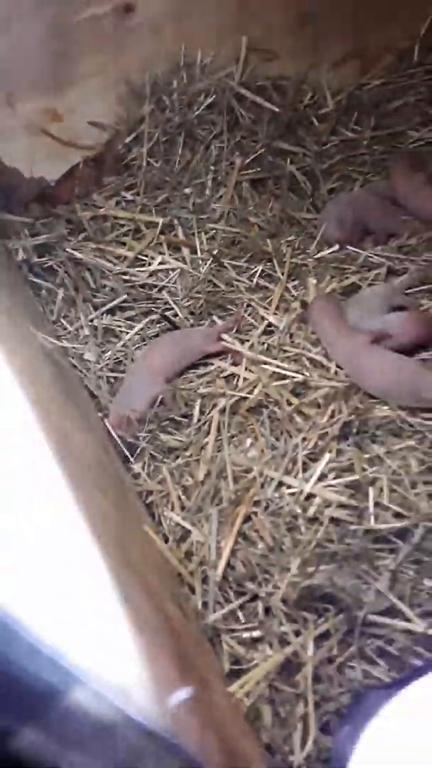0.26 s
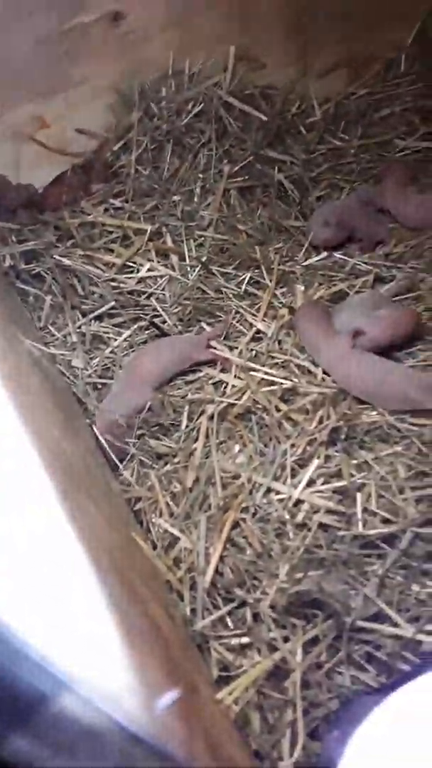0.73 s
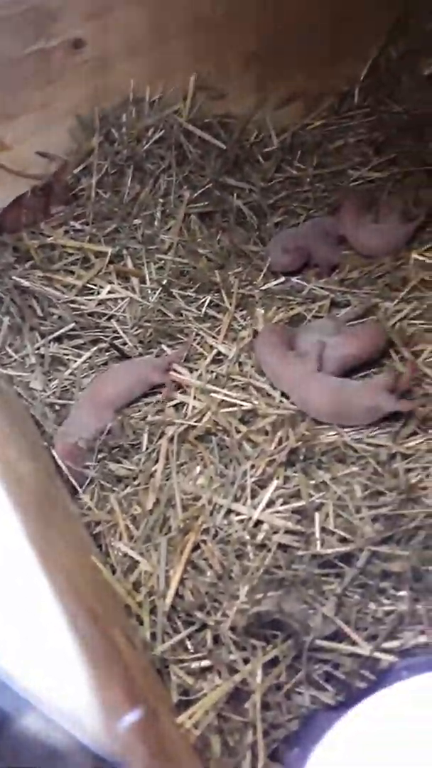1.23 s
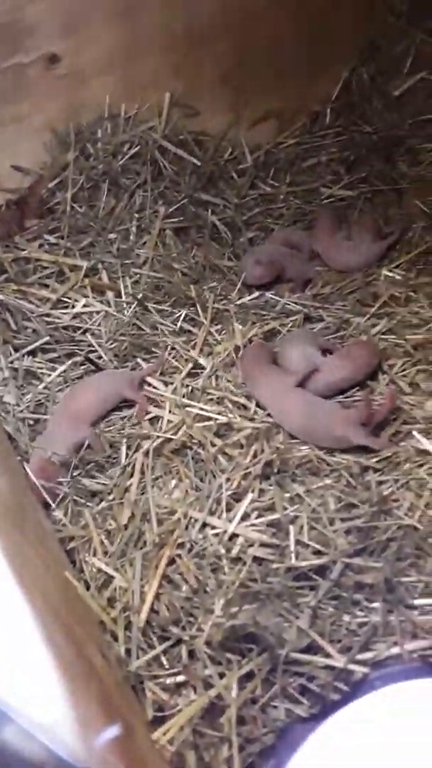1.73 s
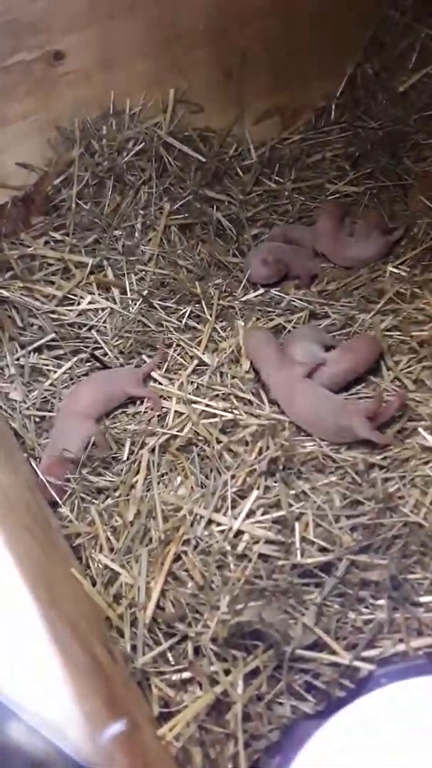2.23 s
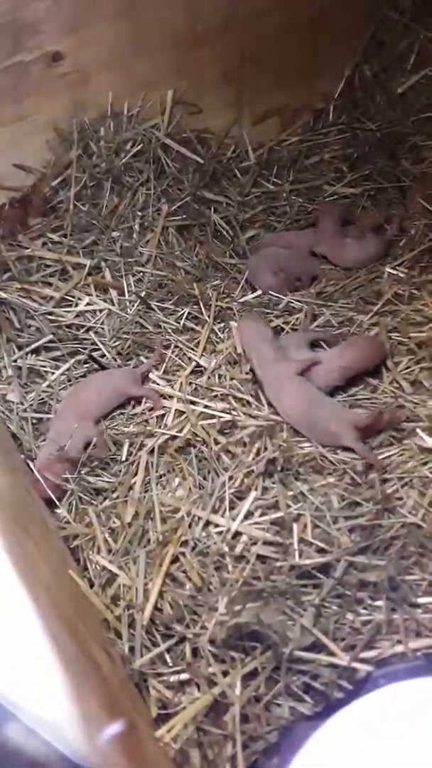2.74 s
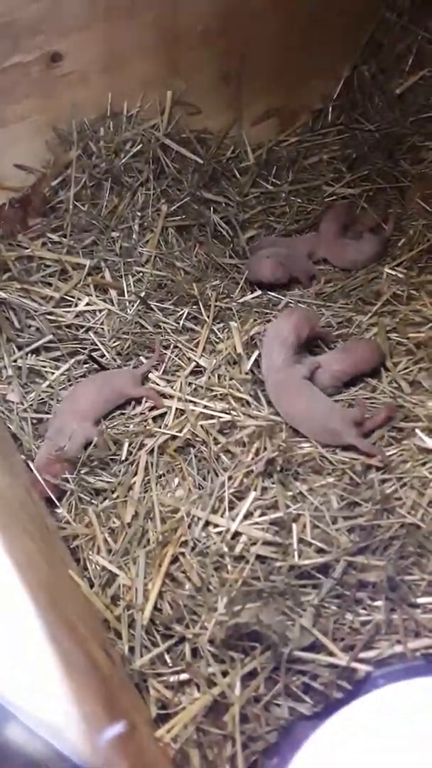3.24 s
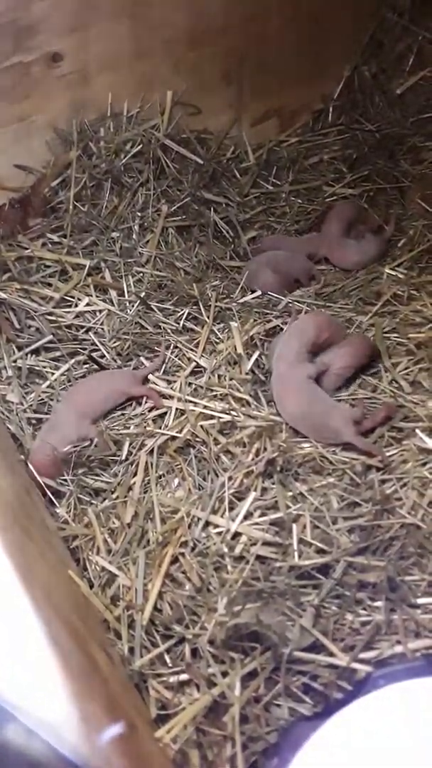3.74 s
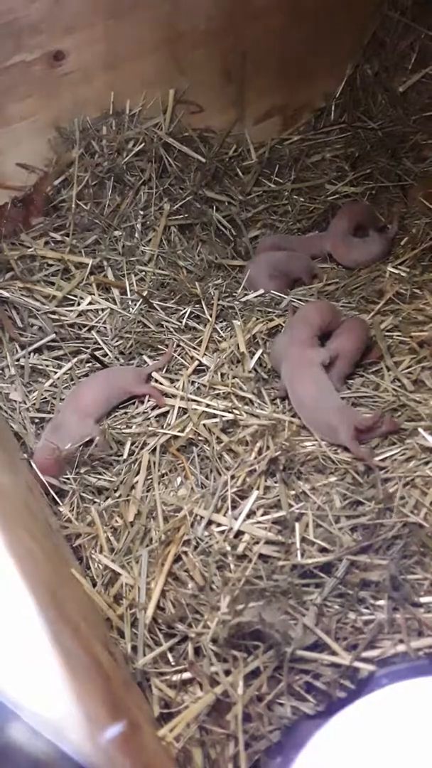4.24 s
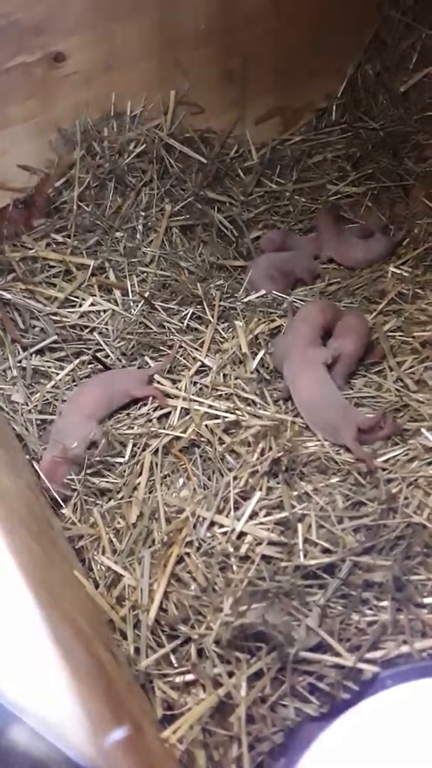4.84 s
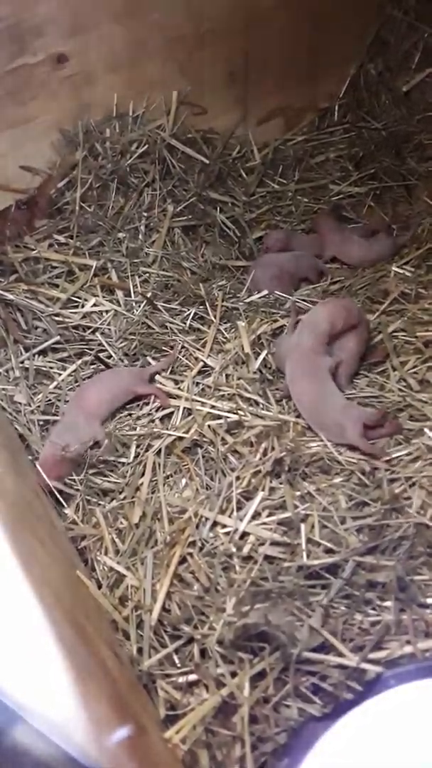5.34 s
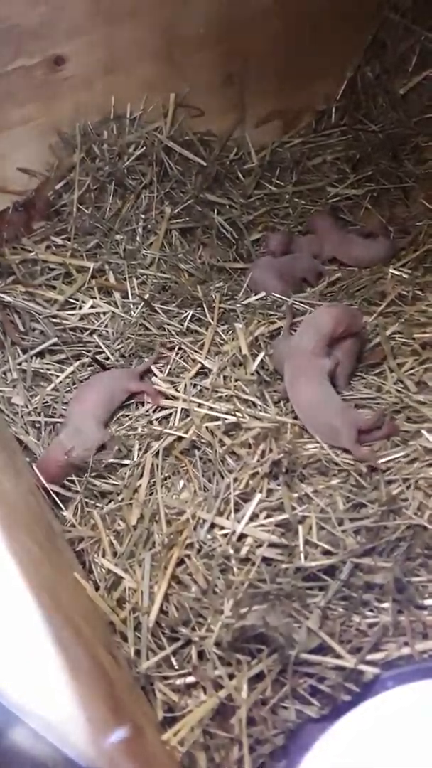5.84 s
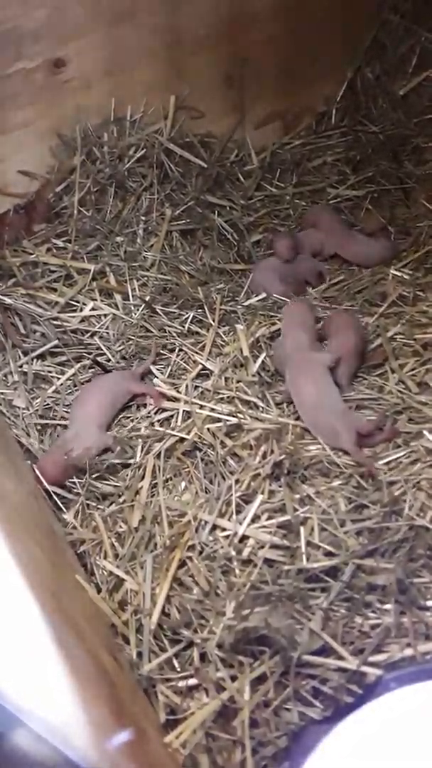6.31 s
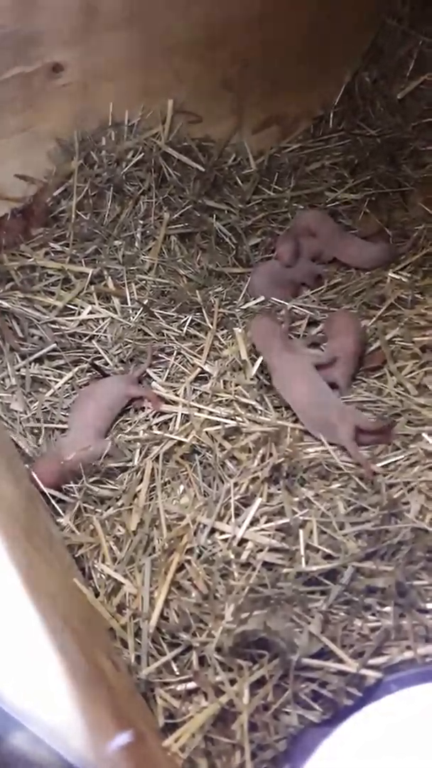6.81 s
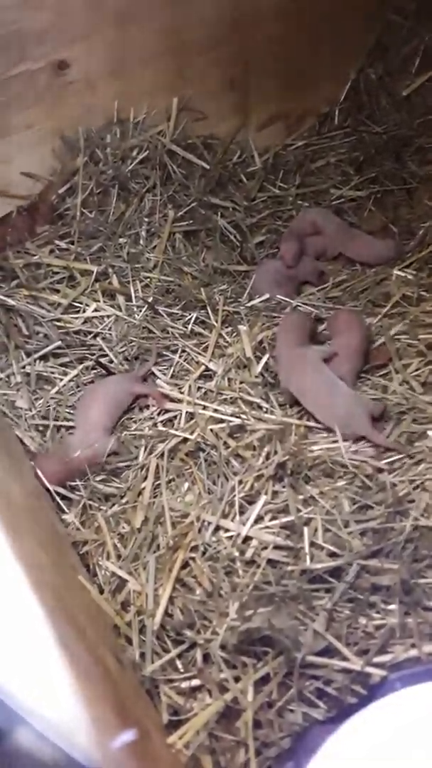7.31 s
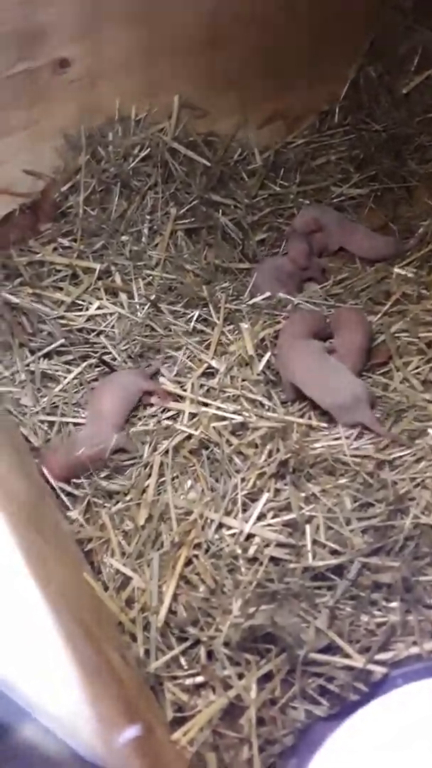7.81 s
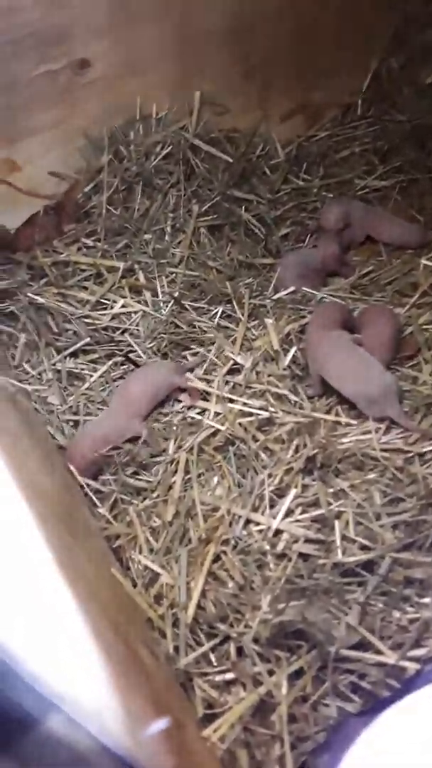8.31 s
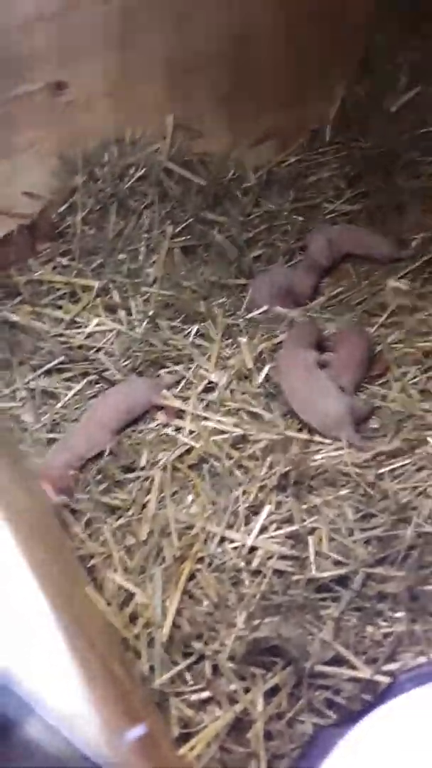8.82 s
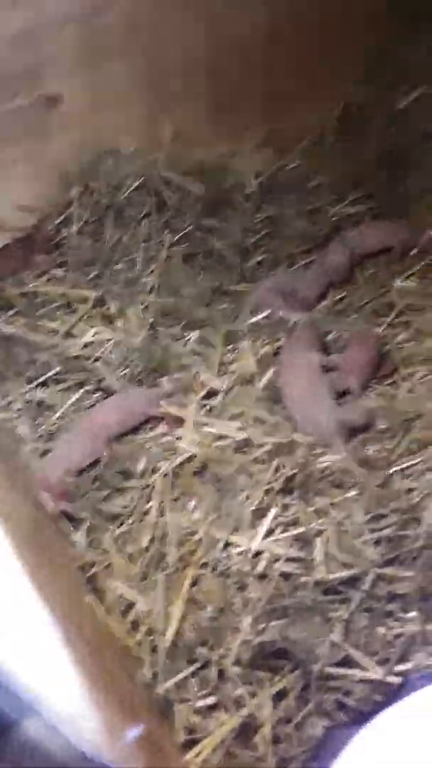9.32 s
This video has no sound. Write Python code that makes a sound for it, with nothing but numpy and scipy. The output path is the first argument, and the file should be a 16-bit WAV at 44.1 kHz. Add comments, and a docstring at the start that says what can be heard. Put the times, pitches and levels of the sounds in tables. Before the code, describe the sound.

Close, dry sound inside a small wooden nest box over a low quiet hush. Straw rustles softly, building to a burst of crisp snaps around three seconds. Tiny newborn ferret kits give faint, brief squeaks and breathy puffs. Sharp knocks and bright clicks jump out past four seconds with a scraping slide, then a faint creaky cry, another double knock at six, and light rustling to the end.

```python
"""Ferret kits in a straw nest

Newborn kits squeak faintly in a wooden nest box, close to a hand-held camera's microphone.
Squeaks are harmonic stacks and one creak is pulsed; breathy puffs are noise in two bands. Straw is gritty
noise, ticks and snaps; dry slides are dense fine grains. Knocks and clicks are falling tones that reach the
microphone through the box and the camera body. Soft bumps are resonant noise over the room's low hush."""
import sys
import numpy as np
from scipy import signal
from scipy.fft import rfft, irfft, next_fast_len
from scipy.io import wavfile
from scipy.ndimage import uniform_filter1d, map_coordinates

SR = 44100
rng = np.random.default_rng(int(sys.argv[2]) if len(sys.argv) > 2 else 0)


def unload_wav(signal):
    """Save mono or channel-first audio to the path in sys.argv[1] as 16-bit WAV at rate SR, clipped to [-1, 1]."""
    wavfile.write(
        sys.argv[1],
        SR,
        np.round(np.clip(np.atleast_2d(signal).T, -1, 1) * 32767).astype(np.int16),
    )


N = 421596  # length in samples

# knocks on a thin panel: [t/s, level/dB, pitch drop f/Hz]
PANEL_KNOCKS = [(0.38, -31.5, 617), (4.3817, -9.5, 1460), (4.3884, -14.5, 1086), (4.441, -12.5, 1960),
                (4.694, -24.5, 830), (5.144, -22.5, 934), (6.2319, -8, 1936), (6.242, -8.5, 1300),
                (6.64, -29, 883), (7.226, -21, 454), (7.341, -29.5, 497), (7.493, -27, 540),
                (7.603, -31, 298), (7.789, -20.5, 650)]

TOP_HZ = 15900  # the microphone's band limit
BOUT_ATTACK_S = 0.016  # a bout of wriggling and the creaky cry both start briskly
STROKE_RELEASE_S = 0.01  # sliding strokes and the creaky cry both stop short


def kits():
    """The nearest kits squeak; the longer a cry, the more its pitch arches."""
    # single squeaks: [t/s, length/s, middle f/Hz, rise from start to end f/Hz, level/dB, overtone level/dB]
    cries = [(2.516, 0.036, 2500, -150, -48, -14), (2.569, 0.068, 2600, -130, -44.5, -11),
             (3.67, 0.029, 2560, -300, -50, -15), (3.994, 0.081, 1690, 5, -49.5, 4),
             (4.06, 0.052, 2595, -170, -47, -10), (4.229, 0.031, 2180, 0, -52, -22),
             (4.281, 0.033, 1030, -120, -51, 7), (4.312, 0.038, 2160, -50, -50, -20),
             (5.717, 0.031, 1883, 698, -48, -2), (6.253, 0.04, 2500, -310, -51, -10),
             (7.267, 0.027, 2110, 200, -50.5, -17), (7.41, 0.18, 837, 470, -50, 9),
             (7.436, 0.044, 2170, 1502, -55, -16), (8.043, 0.037, 2560, -36, -53, -20),
             (8.305, 0.012, 2640, 0, -49, -20), (8.4, 0.023, 2450, -260, -45.5, -6),
             (8.591, 0.125, 1257, 30, -53, -6), (8.706, 0.108, 1215, -40, -52.5, -4.5)]
    arch_share, full_arch_s = 0.064, 0.085  # drop of the ends below the middle, reached at this length
    out = np.zeros(N)
    for s, length, pitch_hz, rise_hz, db, overtones_db in cries:
        ends_hz = pitch_hz * (1 - arch_share * min(length / full_arch_s, 1) ** 2)
        start_hz, end_hz = ends_hz - rise_hz / 2, ends_hz + rise_hz / 2
        cry = squeak(length, start_hz, pitch_hz, end_hz, .018, overtones_db)
        add(out, s, amp(db) * cry)
    return out


def squeak(length, start_hz, middle_hz, end_hz, jitter, overtones_db=0, count=12):
    """One arched tone: a trembling harmonic stack through a tiny throat, each partial veiled in air."""
    # air that veils a squeak, most in low pressed cries: [pitch f/Hz, level/dB]
    hoarseness = [(800, -8), (1200, -14), (2600, -13)]
    # colour of the tiny throat: [f/Hz, level/dB]
    throat = [(600, -34), (1200, -2.5), (2500, -1.5), (3600, -5), (5100, -1.5), (8200, -3), (14000, -31)]
    u = np.linspace(0, 1, max(int(length * SR), 200))

    def flutter():
        """Slow random tremble at rms 1."""
        return coloured(rng.standard_normal(len(u)), [(150, 0), (600, -40)])

    hoarse = amp(along(hoarseness, middle_hz))
    arch = np.polyval(np.polyfit([0, .5, 1], [start_hz, middle_hz, end_hz], 2), u)
    pitch = arch * (1 + jitter * hoarse * flutter())
    k = np.arange(1, count + 1)[:, None]
    air = hoarse * np.array([flutter() + 1j * flutter() for _ in k])
    voice = np.imag((1 + air) * np.exp(2j * np.pi * k * np.cumsum(pitch) / SR))
    partials = amp(along(throat, k * pitch)) * (k * pitch < TOP_HZ) * voice
    stack = (partials * amp(overtones_db * (k > 1))).sum(0)
    return unit(stack * np.abs(np.sin(np.pi * u)) ** .5)


def rasp():
    """A kit creaks: uneven pulses in breath noise, slowing from a buzz to a rattle, ring its throat."""
    # colour of the creak, strongest at the top of the throat: [f/Hz, level/dB]
    creak_colour = [(700, -14), (2500, -5.5), (5800, -9), (7500, 1), (9000, -10.5), (14000, -29)]
    start_s, length_s, level_db = 5.35, 0.35, -43
    start_hz, end_hz = 599, 100.7  # the pulses slow down as the air runs out
    out = np.zeros(N)
    strength = effort(length_s, BOUT_ATTACK_S, STROKE_RELEASE_S, sag_db_per_s=21.5)
    u = np.minimum(np.arange(len(strength)) / SR / length_s, 1)
    rate = start_hz * (end_hz / start_hz) ** u * (1 + .5 * rng.standard_normal(len(u)))
    pulses = np.diff(np.floor(np.cumsum(rate) / SR), prepend=0)
    breath = 2.0 * rng.standard_normal(len(u))
    add(out, start_s, amp(level_db) * strength * coloured(unit(pulses) + breath, creak_colour))
    return out


def breathy_puffs():
    """Breathy puffs of noise in two bands, the lower one around a faint wavering tone."""
    # breathy puffs: [t/s, length/s, level/dB, upper band level/dB, pitch f/Hz]
    puffs = [(0.119, 0.17, -44, -2, 2290), (0.291, 0.52, -50.5, -11, 2695), (0.847, 0.22, -41.5, 1, 2505),
             (1.504, 0.43, -45, -1, 2570), (5.775, 0.14, -45, 0.5, 2650), (5.971, 0.74, -51, -14, 2584),
             (7.069, 0.35, -51.5, -7, 2630), (7.718, 0.67, -50.5, -31, 2545), (8.474, 0.03, -47, -19, 3350),
             (8.891, 0.18, -46, -1, 2540), (9.377, 0.076, -48, 7, 2530)]
    out = np.zeros(N)
    for s, length, db, upper_db, pitch_hz in puffs:
        def bands(hz):
            """The band at the puff's pitch and the upper one."""
            lower = resonance(hz, pitch_hz, width_hz=1250) ** 2
            return lower + amp(upper_db) * resonance(hz, 7560, width_hz=1900) ** 2

        tone = squeak(length, pitch_hz, pitch_hz, pitch_hz, jitter=0.1356, count=1)
        add(out, s, amp(db - 4.0) * (swell(length, bands) + amp(-7.5) * tone))
    return out


def straw(crisp, dull):
    """Crawling bodies bend stalks (crisp ticks) and scuff the packed bedding (dull grains)."""
    # pushes into the bedding: [t/s, length/s, crisp level/dB, dull level/dB, clump f/Hz]
    pushes = [(0.793, 0.055, -66, -38.5, 480), (0.851, 0.047, -61, -35.5, 674),
              (1.464, 0.04, -55, -39, 750), (1.59, 0.091, -43, -35.5, 640), (2.227, 0.021, -41.5, -33, 446),
              (2.28, 0.075, -38, -33, 600), (2.463, 0.085, -38, -35, 780), (2.569, 0.069, -41.5, -35, 650),
              (2.709, 0.043, -44, -33.5, 580), (2.799, 0.046, -48, -35.5, 530),
              (3.176, 0.064, -37, -27, 1130), (3.591, 0.1, -56, -42, 930), (3.783, 0.025, -45, -30.5, 1760),
              (4.315, 0.028, -51, -41, 930), (6.099, 0.017, -47, -49, 600), (6.324, 0.028, -41, -51, 500),
              (6.995, .03, -53, -42, 2430), (9.221, 0.036, -40.5, -39, 870)]
    # colour of the loose stalks: [f/Hz, level/dB]
    stalk_colour = [(710, -11), (1200, -5.5), (1910, -8), (2600, -4.5), (4650, -5), (8170, -1),
                    (10400, -10.5), (11800, -37.5), (16000, -55)]
    # colour of the packed bedding: [f/Hz, level/dB]
    bedding_colour = [(350, -9.5), (430, 8), (520, -3.5), (650, 1), (900, -2), (1600, -11.5), (2500, -4.5),
                      (4000, -39)]
    # the stalks stir fairly evenly; the bedding gives way in jerks
    crisp = crisp * amp(-1.5 + 2.3 * wobble(70))
    dull = dull * amp(-1.0 + 4.2 * wobble(40))
    clumps = np.zeros(N)
    # each push of a leg gives way quickly, settles slowly and shakes a clump with its own pitch
    for s, length, crisp_db, dull_db, clump_hz in pushes:
        u = np.arange(SR // 4) / SR / max(length, .01)
        push = (1 - np.exp(-u / 0.019)) * np.exp(-u ** 2)
        clump = filtered(rng.standard_normal(len(u)), lambda hz: resonance(hz, clump_hz, clump_hz * 0.28))
        add(crisp, s, amp(crisp_db) * push)
        add(clumps, s, amp(dull_db - 5.0) * push * unit(clump))
    stalks = coloured(patchy(grit(N, rate=1200, spread_db=6.0, share=0.39), depth_db=2.5), stalk_colour)
    bedding = coloured(patchy(grit(N, rate=200, spread_db=3.0, share=0.22), depth_db=3.5), bedding_colour)
    return crisp * stalks + dull * bedding + clumps


def wriggling():
    """Strength of the crisp rustle and of the dull scuffing; overlapping bouts add in power."""
    # bouts of wriggling in the straw: [t/s, length/s, crisp rustle level/dB, dull scuffing level/dB]
    bouts = [(0.339, 0.85, -52, -57), (0.831, 0.27, -43.5, -49.5), (1.345, 0.18, -48.5, -55.5),
             (1.587, 0.29, -42.5, -53.5), (1.976, 0.79, -47, -55.5), (2.873, 0.27, -41, -45.5),
             (3.145, 0.38, -37.5, -45.5), (3.565, 0.22, -44, -45.5), (3.89, 0.29, -47.5, -51.5),
             (4.296, 0.07, -44.5, -43), (5.13, 0.81, -56, -62), (6.08, 0.22, -49.5, -69),
             (6.937, 0.52, -50.5, -64.5), (7.384, 0.62, -48.5, -53), (8.108, 0.94, -51, -60.5),
             (9.131, 0.15, -48.5, -54.5), (9.352, 0.27, -46.5, -54)]
    # the straw between bouts
    crisp, dull = np.full(N, amp(-59) ** 2), np.full(N, amp(-66.5) ** 2)
    for s, length, crisp_db, dull_db in bouts:
        # the negative sag lets a bout grow slightly until it settles
        bout = effort(length, BOUT_ATTACK_S, release_s=0.072, sag_db_per_s=-1.5)
        add(crisp, s, (amp(crisp_db) * bout) ** 2)
        add(dull, s, (amp(dull_db) * bout) ** 2)
    return np.sqrt(crisp), np.sqrt(dull)


def ticks(crisp, dull):
    """Single stalks flick free and ring briefly, low ones with the scuffing, high ones with the rustle."""
    ticks_per_s, tick_db, spread_db = 42, 12.5, 14
    decay_cycles = 23  # cycles in which a tick falls 60 dB
    low_hz, high_hz = 431, 9070  # thick packed stalks to thin loose ones
    out, t = np.zeros(N), np.arange(SR // 16) / SR
    for when, thinness, chance in rng.random((int(ticks_per_s * N / SR), 3)):
        i = int(when * N)
        hz = low_hz * (high_hz / low_hz) ** thinness
        movement = dull[i] ** (1 - thinness) * crisp[i] ** thinness
        strength = movement * amp(tick_db + spread_db * (2 * chance - 1.5))
        ring = (1 - np.exp(-hz * t)) * amp(-60 * hz * t / decay_cycles)
        add(out, i / SR, strength * ring * np.sin(2 * np.pi * hz * t))
    return out


def snaps(crack_t60=0.031, shiver_t60=0.077):
    """A stalk gives way fibre by fibre and rings at its own pitches; its neighbours shiver to rest."""
    # snapping straws: [t/s, level/dB, body level against the crack/dB]
    breaks = [(3.052, -19.5, -38), (3.082, -20, -32), (3.1062, -22, -31), (3.183, -12, -23),
              (3.2226, -16.5, -21), (3.2611, -8, -15), (3.342, -14.5, -2), (3.4243, -18, -8),
              (3.481, -19, -32), (3.5067, -11, -44), (7.0746, -29.5, -32), (7.589, -25.5, -5),
              (8.984, -20, -8), (9.0215, -29, -7)]
    # colour of the crack: [f/Hz, level/dB]
    crack_colour = [(900, -49), (1800, -11), (3000, -26), (4000, 2.5), (4800, -9.5), (6200, 1), (9200, 6),
                    (10400, 0), (11500, -11), (16000, -25)]
    out, t = np.zeros(N), np.arange(SR // 4) / SR
    decay = amp(-60 * t / crack_t60) + amp(-3.5) * amp(-60 * t / shiver_t60)
    shape = decay * (1 - np.exp(-t / 0.00073))
    for s, db, body_db in breaks:
        stalk_hz = 3500 + 5000 * rng.random(size=3)
        fibres = grit(len(t), rate=1800, spread_db=6, share=0.53)
        crack = filtered(fibres, lambda hz: 1 + sum(resonance(hz, c, width_hz=800) for c in stalk_hz))
        thud = unit(filtered(fibres, lambda hz: resonance(hz, 1850, width_hz=5400) ** 2))
        add(out, s, amp(db - 7.5) * shape * (coloured(crack, crack_colour) + amp(body_db) * thud))
    return out


def slides():
    """Smooth dry friction: dense fine grains that wake a few broad resonances."""
    # colour of the grains: [f/Hz, level/dB]
    hiss_colour = [(180, -15), (300, -8.5), (380, -11.5), (856, -9.5), (1360, -15.5), (2100, -8.5),
                   (4230, -7.5), (8220, 0.5), (10000, -2.5), (11300, -18), (16000, -31)]
    # resonances woken by the friction: [f/Hz, width/Hz, level/dB]
    peaks = [(878, 100, -13.5), (2116, 520, -9), (6200, 860, -7.5)]
    grains = grit(N, rate=4200, spread_db=-4, share=0.59)
    body = filtered(rng.standard_normal(N),
                    lambda hz: sum(amp(db) * resonance(hz, c, w) ** 2 for c, w, db in peaks))
    friction = coloured(grains, hiss_colour) + amp(-7.5) * unit(body)
    return pressure() * amp(0.97 * wobble(53)) * friction


def pressure():
    """Strength of the sliding strokes, each losing pressure as it goes."""
    # dry sliding strokes: [t/s, length/s, level/dB]
    strokes = [(0, 0.11, -32.5), (0.13, 0.094, -41.5), (0.235, 0.14, -37), (0.28, 0.071, -32),
               (4.472, 0.13, -31), (4.549, 0.5, -26.5), (5.07, 0.061, -31), (6.357, 0.23, -30.5),
               (6.576, 0.051, -24.5)]
    power = np.zeros(N)
    for s, length, db in strokes:
        stroke = effort(length, attack_s=0.022, release_s=STROKE_RELEASE_S, sag_db_per_s=19)
        add(power, s, (amp(db) * stroke) ** 2)
    return np.sqrt(power)


def knocks(last_hz=185, push_hz=85):
    """Bending waves spread as they travel: the highs arrive first and the pitch drops into a thud."""
    # modes of the knocked panel: [f/Hz, width/Hz, level/dB]
    modes = [(261, 88, 1), (612, 66, -7.5), (870, 270, -4)]
    out, t = np.zeros(N), np.arange(SR // 8) / SR
    ring = (1 - np.exp(-t / .0008)) * np.exp(-(t / .0095) ** 2)
    for s, db, drop_hz in PANEL_KNOCKS:
        # softer knocks drop in pitch more slowly: the time doubles for every 16 dB
        glide_s = 0.002065 * 2 ** ((-10 - db) / 16)
        pitch = last_hz + drop_hz * np.exp(-t / glide_s)
        # reflections from the panel's edges roughen the glide
        scatter = unit(filtered(rng.standard_normal(len(t)), lambda hz: resonance(hz, 95, width_hz=1030) ** 2))
        wave = np.sin(2 * np.pi * np.cumsum(pitch) / SR + .5 * scatter)
        # hard knocks also shove the whole panel
        shove = amp(db + 6) * np.sin(2 * np.pi * push_hz * t)
        add(out, s, amp(db - 9.0) * (wave + shove) * ring)
    return filtered(out, lambda hz: 1 + 2 * sum(amp(db) * resonance(hz, c, w) for c, w, db in modes))


def clicks():
    """Lone clicks, and the contact that starts each knock, softened at the very top."""
    # lone sharp clicks: [t/s, level/dB, centre f/Hz]
    lone = [(4.3913, -14, 6060), (4.6753, -4.5, 8240), (4.689, -4.5, 7220), (4.693, -12.5, 3330),
            (5.1506, -23, 6700), (7.4915, -26.5, 3480), (7.7745, -24, 3260), (8.2442, -27.5, 7380),
            (8.985, -23.5, 4450)]
    # the contact loses 1.7 dB for each dB of a softer knock
    contacts = [(s, -15 + 1.7 * (db + 10), 6870) for s, db, _ in PANEL_KNOCKS]
    out = np.zeros(N)
    for s, db, hz in list(lone) + contacts:
        add(out, s, amp(db) * click(hz))
    return filtered(out, lambda hz: 1 / (1 + (hz / 10700) ** 12))


def click(hz, rattle=0.3, rattle_s=0.0015):
    """A hard contact of peak about 1: a chirp falling through hz, then a short toneless rattle."""
    peak_s, octave_s = 0.000488, 0.000452  # rise time; time in which the pitch falls an octave
    t = np.arange(SR // 100) / SR
    pitch = hz * 2 ** ((peak_s - t) / octave_s)
    u = t / peak_s
    chirp = (u * np.exp(1 - u)) ** 2 * np.sin(2 * np.pi * (np.cumsum(pitch) / SR + rng.random()))
    tail = unit(filtered(rng.standard_normal(len(t)), lambda f: resonance(f, hz, hz / 2)))
    return chirp + rattle * np.minimum(u, 2) * np.exp(-t / rattle_s) * tail


def box(x):
    """The short answer of the wooden walls: decaying noise, 4 ms late."""
    # decay of the box: [f/Hz, t60/s]
    decay = [(200, 0.049), (2000, 0.09), (8000, 0.22), (15000, 0.05)]
    hz, t, z = signal.stft(rng.standard_normal(SR // 3), SR, nperseg=256)
    tail = signal.istft(z * amp(-60 * t / along(decay, hz)[:, None]), SR, nperseg=256)[1]
    answer = np.pad(tail / np.linalg.norm(tail), (int(0.004 * SR), 0))
    return signal.fftconvolve(x, answer)[:N]


def background(dull):
    """Muffled bumps, resonant swells of noise, over the low hush of the room."""
    # soft bumps of bodies and hands: [t/s, length/s, level/dB, pitch f/Hz]
    bumps = [(0.839, 0.098, -43.5, 186), (1.844, 0.066, -46.5, 168), (2.223, 0.1, -45.5, 203),
             (2.863, 0.097, -41, 132), (3.344, 0.067, -32.5, 145), (3.617, 0.25, -39, 165),
             (4.061, 0.07, -39.5, 166), (4.38, 0.12, -42, 89), (4.519, 0.12, -42.5, 160),
             (4.962, 0.05, -42.5, 159), (7.95, 0.22, -46, 163), (8.102, 0.07, -43, 88.5),
             (8.596, 0.25, -44.5, 78), (9.142, 0.065, -41, 130)]
    # colour of the room's hush: [f/Hz, level/dB]
    hush_colour = [(25, -26), (70, 0.5), (190, -3), (350, -16), (1500, -25), (12500, -30.5), (16000, -40)]
    out = amp(-54.0) * coloured(rng.standard_normal(N), hush_colour)
    for s, length, db, pitch_hz in bumps:
        add(out, s, amp(db) * swell(length, lambda hz: resonance(hz, pitch_hz, pitch_hz * .6) ** 2))
    # scuffing in the bedding also shakes the floor of the box
    floor = unit(filtered(rng.standard_normal(N), lambda hz: resonance(hz, 125, width_hz=253) ** 3))
    return out + amp(-2.0) * dull * floor


def effort(length, attack_s, release_s, sag_db_per_s):
    """Gain over one movement: it rises, sags (or grows, if negative) and dies away after its length."""
    t = np.arange(int(length * SR) + SR // 2) / SR
    rise = 1 - np.exp(-(t / attack_s) ** 2)
    return rise * amp(-sag_db_per_s * t) * np.exp(-np.maximum(t - length, 0) / release_s)


def grit(size, rate, spread_db, share):
    """White friction noise in which a share of the power comes as tiny ticks of uneven size."""
    sizes = amp(spread_db * (2 * rng.random(size) - 1))
    specks = (rng.random(size) < rate / SR) * rng.choice([-1, 1], size) * sizes
    share = np.clip(share, 0, 1)
    return np.sqrt(share) * unit(specks) + np.sqrt(1 - share) * rng.standard_normal(size)


def patchy(x, depth_db):
    """x with a colour that keeps shifting, as ever different stalks rub, at rms 1."""
    z = signal.stft(x, nperseg=512)[2]
    across_pitch = uniform_filter1d(rng.standard_normal(z.shape), size=3, axis=0)
    field = uniform_filter1d(across_pitch, size=16, axis=1)
    return unit(signal.istft(z * amp(depth_db * unit(field)), nperseg=512)[1][:len(x)])


def swell(length, response):
    """A short rounded swell of noise through a resonator, at rms 1."""
    u = np.linspace(0, 1, max(int(length * SR), 200))
    return unit(filtered(rng.standard_normal(len(u)), response) * np.abs(np.sin(np.pi * u)) ** .5)


def wobble(rate):
    """A smooth random curve, rate knots a second."""
    return map_coordinates(rng.standard_normal(int(N * rate / SR) + 4), [np.arange(N) * rate / SR])


def resonance(hz, centre_hz, width_hz):
    """Response of one damped mode."""
    return 1j * hz * width_hz / (centre_hz ** 2 - hz ** 2 + 1j * hz * width_hz)


def coloured(x, spectrum):
    """x filtered by the given spectrum, at rms 1."""
    return unit(filtered(x, lambda hz: amp(along(spectrum, hz))))


def filtered(x, response):
    """x times a response of frequency."""
    m = next_fast_len(len(x) + 8192)  # spare room so that the ringing does not wrap round
    return irfft(rfft(x, m) * response(np.fft.rfftfreq(m, 1 / SR)), m)[:len(x)]


def along(points, hz):
    """(Hz, value) points read on a log frequency axis."""
    f, v = np.transpose(points)
    return np.interp(np.log(hz + 1), np.log(f + 1), v)


def amp(db):
    """Decibels to gain."""
    return 10 ** (np.asarray(db) / 20)


def unit(x):
    """x at rms 1."""
    return x / np.sqrt(np.mean(x ** 2) + 1e-20)


def add(track, s, sound):
    """Mix a sound into the track at time s."""
    start = max(round(s * SR), 0)
    track[start:start + len(sound)] += sound[:max(N - start, 0)]


def scene():
    """Squeaks, snaps, ticks and contacts also wake the box walls; every source arrives directly too."""
    crisp, dull = wriggling()
    nest = kits() + snaps() + ticks(crisp, dull)
    contacts = clicks() + knocks()
    walls = amp(-8.5) * box(nest + amp(-7.0) * contacts)
    breath = breathy_puffs() + rasp()
    friction = straw(crisp, dull) + slides()
    return (nest + contacts + walls + breath + friction + background(dull))[None]


def record(dry):
    """The camera's microphone thins the deepest bass and keeps nothing above its band limit."""
    low_cut = signal.butter(2, 40, "highpass", fs=SR, output="sos")  # corner in Hz
    thinned = signal.sosfilt(low_cut, dry)
    return np.array([filtered(channel, lambda hz: hz < TOP_HZ) for channel in thinned])


dry = scene()
out = record(dry)
unload_wav(out)
```